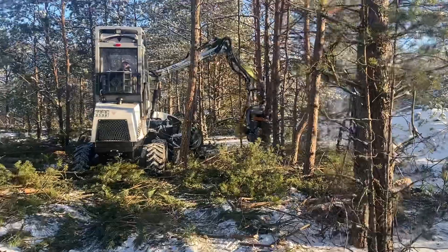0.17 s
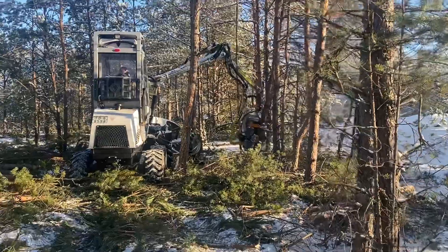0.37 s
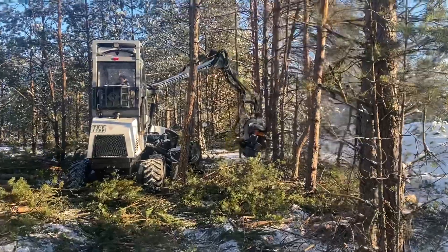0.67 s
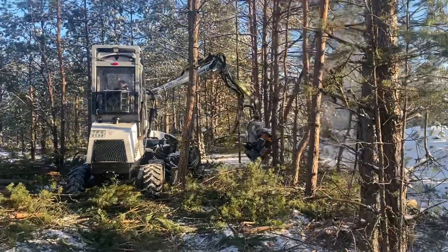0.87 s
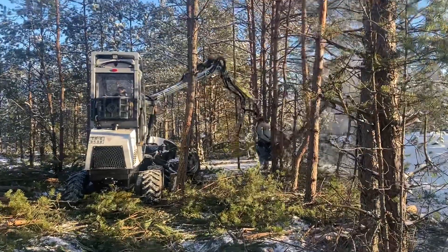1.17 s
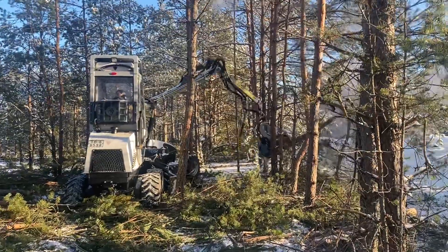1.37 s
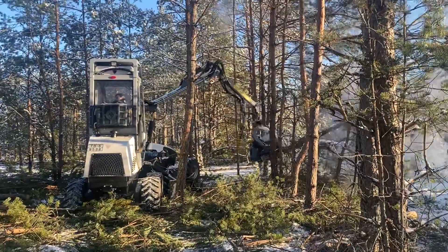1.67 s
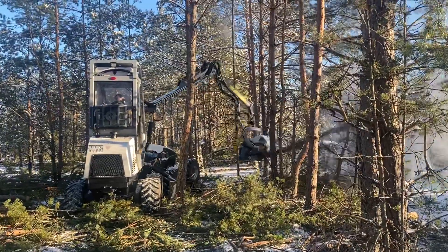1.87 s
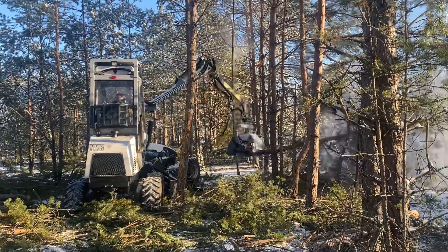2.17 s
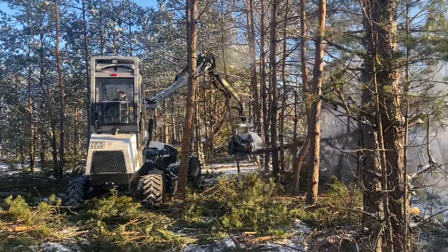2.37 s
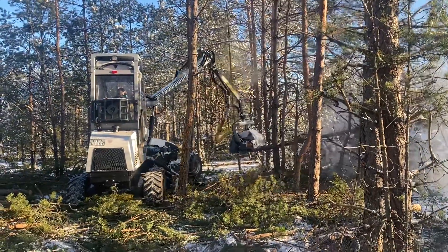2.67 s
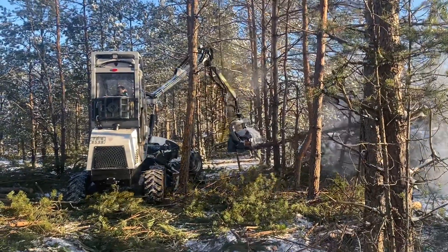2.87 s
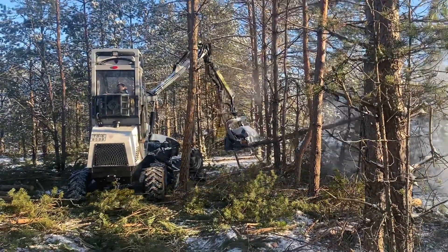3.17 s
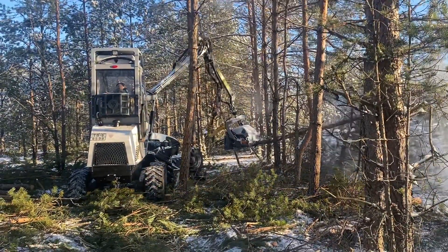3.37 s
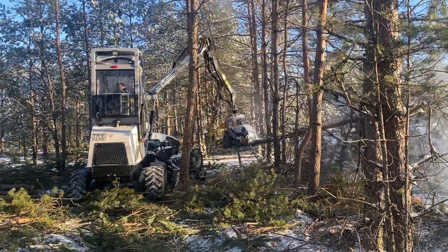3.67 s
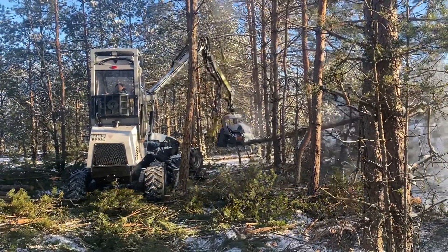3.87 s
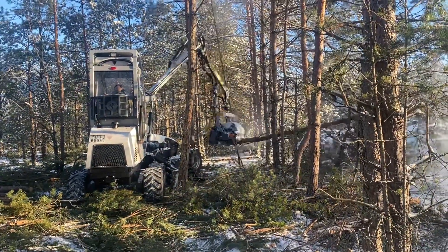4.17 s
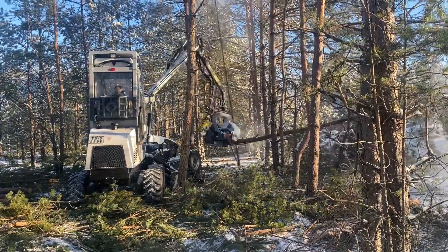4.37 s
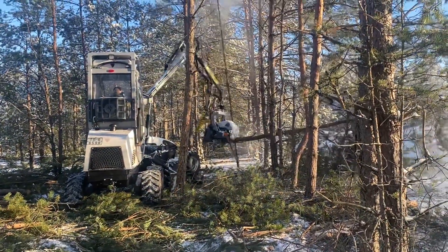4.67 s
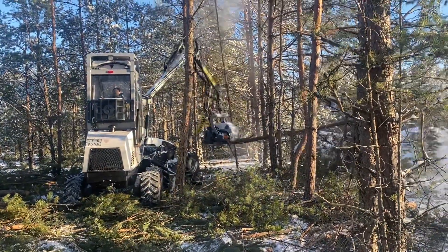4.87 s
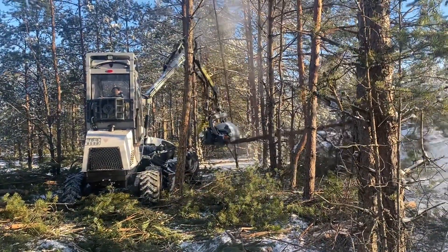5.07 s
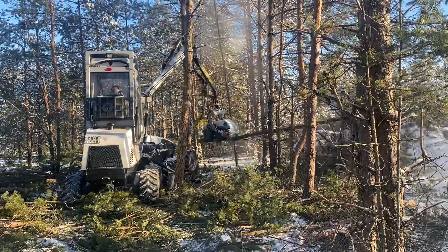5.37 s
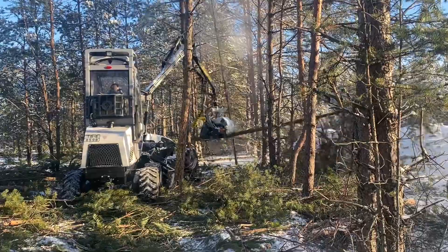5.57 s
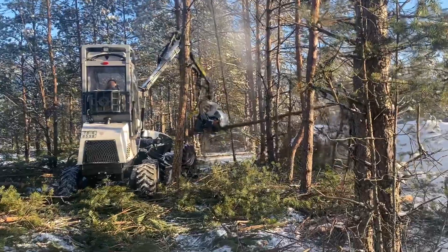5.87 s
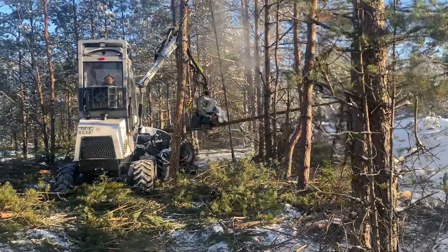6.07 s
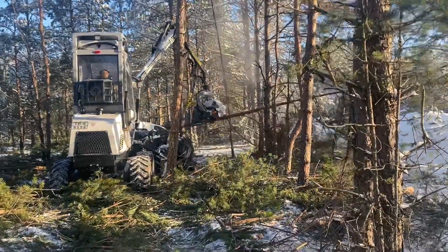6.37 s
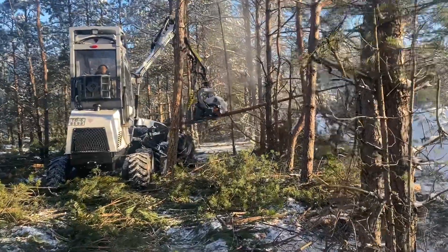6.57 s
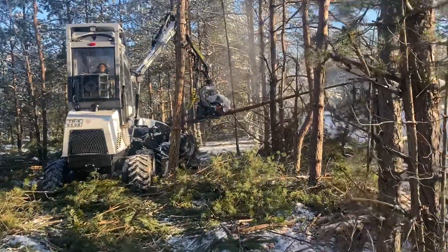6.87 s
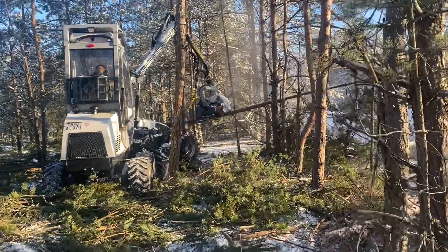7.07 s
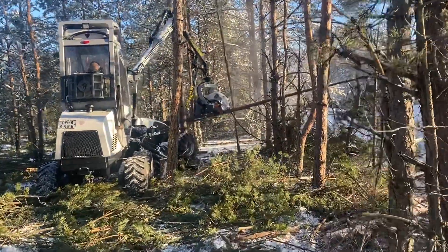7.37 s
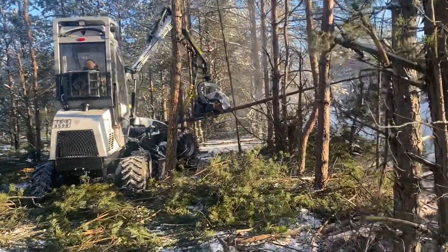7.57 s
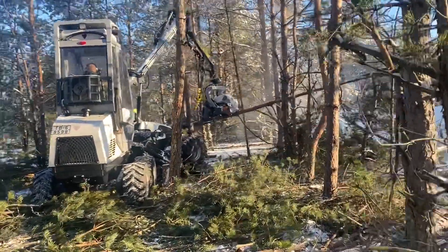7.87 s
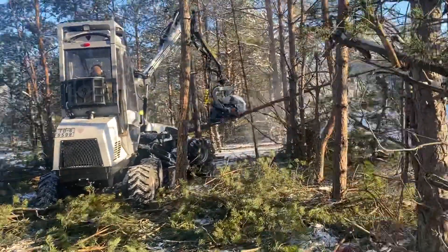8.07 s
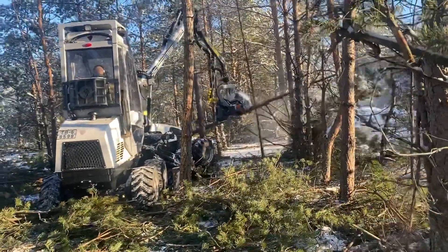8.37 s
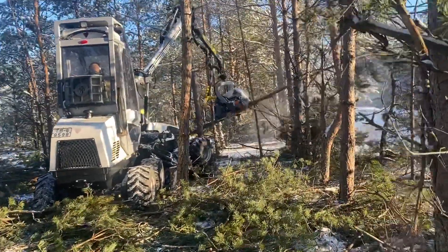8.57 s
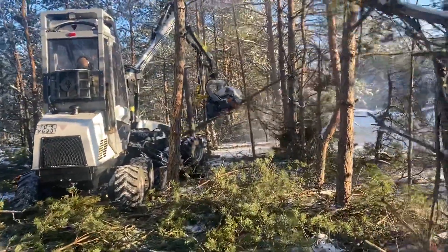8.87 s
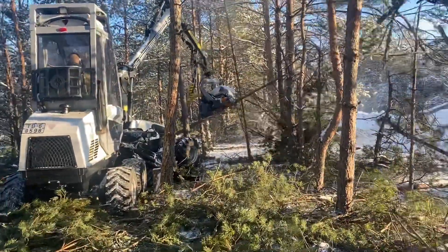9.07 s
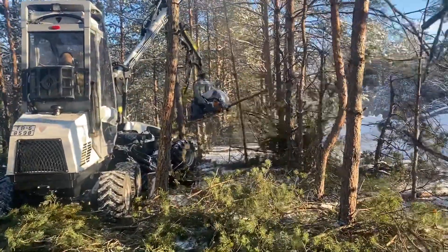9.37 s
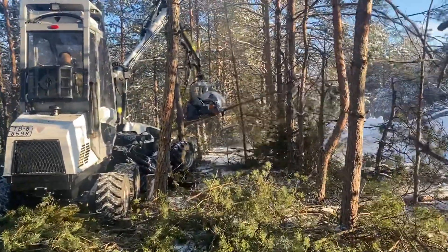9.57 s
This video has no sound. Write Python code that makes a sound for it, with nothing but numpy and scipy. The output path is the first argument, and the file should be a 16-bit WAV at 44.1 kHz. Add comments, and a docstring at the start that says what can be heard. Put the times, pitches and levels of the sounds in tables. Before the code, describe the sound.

A forest harvester's diesel drones and clatters steadily, bogging into a deep boom twice as branches crack sharply and the stem knocks.

```python
"""Forest harvester among snowy pines

A diesel drones as firing-rate harmonics, bogging down and booming whenever the head feeds the stem; shaped
noise throbbing at the firing rate makes the roar and clatter, further tones the whine of fan and pumps.
Twigs snap in bright noise bursts, the stem knocks on the knives as ringing modes, needles and snow rustle
as ticking hiss. The trunks scatter cracks and noise, and two microphones shade and delay what arrives."""
import sys
import numpy as np
from scipy import signal
from scipy.fft import rfft, irfft
from scipy.io import wavfile
from scipy.ndimage import uniform_filter1d

SR = 44100
rng = np.random.default_rng(int(sys.argv[2]) if len(sys.argv) > 2 else 0)


def gain_from_decibels(decibels):
    """Convert decibel values to linear amplitude factors."""
    exponent = np.asarray(decibels, float) / 20
    return 10 ** exponent


def materialize(psi):
    """Save the field psi as 16-bit PCM at rate SR to the path in sys.argv[1].

    A 1-D psi becomes a single channel; in a 2-D psi each row is a channel.
    """
    bounded = np.clip(np.atleast_2d(psi).T, -1, 1)
    quanta = np.round(bounded * 32767).astype(np.int16)
    wavfile.write(sys.argv[1], SR, quanta)


N = 429093
HZ = np.fft.rfftfreq(N, 1 / SR)

# machine noise, growing as it draws nearer: (time [s], roar level [dB], clatter level [dB],
# change of the second exhaust tone [dB], change of the higher exhaust tones [dB])
MACHINE_LEVELS = [(0, -28, -37.5, -2.5, 0.5), (2.2, -27.5, -38, -1.5, -0.5), (3.4, -28, -37.5, -1, -0.5),
                  (3.85, -28.5, -39.5, 1.5, 1.5), (4.9, -28, -38.5, 1, -1), (6.1, -26.5, -35.5, 0, -2),
                  (6.9, -27, -34.5, 4.5, -2), (7.4, -26.5, -35, 3.5, 2), (7.8, -26, -34.5, 1, 2.5),
                  (8.7, -24.5, -34, -2.5, 2), (9.25, -26, -36, -1.5, 2.5), (9.73, -25, -34, 4, 6)]


def level(x, db):
    """Scale to an rms level."""
    return x * gain_from_decibels(db) / np.sqrt(np.mean(x ** 2))


def curves(table):
    """Columns of a table joined by straight lines in time."""
    s, *columns = np.transpose(table)
    return [np.interp(np.arange(N) / SR, s, c) for c in columns]


def noise(colour):
    """Noise with a spectrum of (frequency [Hz], density [dB per Hz]) points, rms 1."""
    hz, db = np.transpose(colour)
    gain = gain_from_decibels(np.interp(np.log(HZ + 1), np.log(hz), db, left=-80, right=-80))
    return level(irfft(gain * rfft(rng.standard_normal(N)), N), 0)


def walk(rate_hz):
    """Random levels held 1 / rate_hz seconds and slewed twice; spread near 1."""
    k = int(SR / rate_hz)
    steps = np.repeat(rng.standard_normal(N // k + 1), k)
    return 1.26 * uniform_filter1d(uniform_filter1d(steps, k), k)[:N]


def add(track, s, piece):
    """Mix a short piece into a track at a time."""
    i = int(s * SR)
    track[i:i + len(piece)] += piece[:N - i]


def ring(x, hz, t60_s):
    """One decaying mode: a two-pole resonator."""
    r = np.exp(-np.log(1000) / (t60_s * SR))
    turn = 2 * np.pi * hz / SR
    return signal.lfilter([np.sin(turn)], [1, -2 * r * np.cos(turn), r * r], x)


def engine_state():
    """Crank phase at the firing rate, load 0-1 and firing tone level; feeding the stem slows and loads the engine."""
    # (time [s], firing rate [Hz], firing tone level [dB])
    engine = [(0, 67.07, -34), (.65, 67.64, -39), (.8, 67.55, -32), (.99, 67.66, -26), (1.12, 67.96, -35.5),
              (1.3, 67.7, -33), (1.5, 68, -31), (1.57, 67.75, -41), (4.38, 68.4, -42), (4.5, 67.4, -34),
              (4.72, 67.7, -31), (4.85, 68, -48), (4.98, 65.1, -29), (5.12, 61.5, -16.5), (5.28, 65.3, -22),
              (5.47, 61.46, -17.5), (5.63, 62.9, -16.5), (5.76, 63.87, -19.5), (5.92, 63.92, -19.5),
              (6.27, 64.9, -19), (6.44, 70.24, -35.5), (7.35, 69.55, -35.5), (7.65, 68.5, -39),
              (7.95, 68.86, -34.5), (8.05, 64.52, -20.5), (8.42, 63.6, -17.5), (9.14, 63.9, -19),
              (9.26, 69.1, -34), (9.73, 68, -55)]
    idle_db, full_db = -38, -18  # firing tone at load 0 and 1
    hz, firing_db = curves(engine)
    wavering_hz = uniform_filter1d(hz, SR // 25) * (1 + 0.00521 * walk(25))
    turn = 2 * np.pi * np.cumsum(wavering_hz) / SR
    load = np.clip((firing_db - idle_db) / (full_db - idle_db), 0, 1)
    return turn, load, firing_db


def tones(turn, load, firing_db):
    """Exhaust harmonics that swell and steady with load, fan and pump tones, and a hum that ignores engine speed."""
    # exhaust and pump tones: (multiple of the firing rate, unloaded level [dB], full-load level [dB], waver [dB])
    harmonics = [(1.62, -39.5, -38, 2.5), (2, -37.5, -26, 2.5), (3, -45, -32, 0.5), (4, -51, -34.5, 4.5),
                 (5, -42, -42, -0.5), (6, -46, -44, 2), (7, -45, -45, 3.5), (8, -44, -69, 1.5),
                 (9, -45, -38, 0.5), (13.5, -49.5, -38, 0.5), (17, -46.5, -49.5, 2)]
    hum_hz, hum_db = 386, -44.5
    uneven = 1 - 0.67 * load
    second_db, upper_db = curves(MACHINE_LEVELS)[2:]
    out = gain_from_decibels(firing_db + 3.0 * uneven * walk(14)) * np.sin(turn + 0.31 * uneven * walk(16))
    for multiple, idle_db, full_db, waver_db in harmonics:
        drift = 3.122 * (multiple - 1) + (0.56 + 0.03 * multiple) * uneven ** 2 * walk(14)
        waver = waver_db * (0.31 + 0.69 * uneven) * walk(9)
        change_db = second_db * (multiple == 2) + upper_db * (3 <= multiple < 10)
        tone_db = idle_db + load ** 2.3 * (full_db - idle_db) + waver + change_db
        out += gain_from_decibels(tone_db) * np.sin(multiple * turn + drift)
    hum_phase = 2 * np.pi * hum_hz * np.arange(N) / SR + 2.4 * walk(7.4)
    out += gain_from_decibels(hum_db + 3.8 * walk(8)) * np.sin(hum_phase)
    return np.sqrt(2) * out  # the levels are rms


def machine_noise(turn, load, rattle):
    """Roar and clatter that throb once a firing, deeper under load; loose parts rattle unevenly."""
    # (frequency [Hz], density [dB per Hz])
    roar_colour = [(18, -61), (30, -28), (54, -6), (136, -3), (168, -7), (210, -4), (239, -9), (263, -5),
                   (381, -4.5), (533, -3.5), (967, -14), (1140, -10.5), (1400, -17.5), (1820, -17.5),
                   (3080, -120)]
    # (frequency [Hz], density [dB per Hz])
    clatter_colour = [(900, -34), (1350, -8.5), (1650, -1), (1900, -3), (2050, 1), (2250, -2.5),
                      (2600, -3.5), (3100, -6), (3500, -11.5), (3900, -18.5), (5000, -25)]
    load_roar_db, load_clatter_db = 1, -1.5  # change at full load
    roar_db, clatter_db, *_ = curves(MACHINE_LEVELS)
    roar_throb = 1 + (0.03 + 0.24 * load) * np.cos(turn + 0.34)
    clatter_throb = 1 + (0.15 + 0.067 * load) * np.cos(turn + 1.0)
    roar = noise(roar_colour) * roar_throb * gain_from_decibels(roar_db + load_roar_db * load)
    clatter = noise(clatter_colour) * clatter_throb * gain_from_decibels(clatter_db + load_clatter_db * load)
    return roar * gain_from_decibels(0.7 * rattle) + clatter * gain_from_decibels(0.75 * rattle)


def snaps(rows):
    """Each break tears for a few milliseconds, with noise about the twig's own pitch, then its echo dies away."""
    # crack spectrum: (frequency [Hz], density [dB per Hz])
    crack_colour = [(2000, -17), (4000, -1.5), (6500, 0.5), (8000, 3), (12000, 1.5), (14000, -7),
                    (15700, -9), (17000, -18)]
    t = np.arange(SR // 5) / SR
    tear = 0.59 * np.exp(-t / 0.0011) + 0.12 * np.exp(-(t / 0.0028) ** 2)
    tear *= np.minimum(t / 0.00089, 1)
    # echoes off the nearest trunks arrive as a bunch after a short gap, over a fading wash
    wash = 0.48 * np.minimum(t / 0.0019, 1) * np.exp(-t / 0.023)
    echo = wash + 0.086 * np.exp(-((t - 0.016) / 0.0038) ** 2)
    uneven = np.pad(gain_from_decibels(2.9 * walk(250)), (0, len(t)))
    top, middle = np.zeros(N), np.zeros(N)
    chances = rng.standard_normal((len(rows), len(t)))
    for (s, db, middle_db, hz, tail_db), chance in zip(rows, chances):
        shape = gain_from_decibels(db) * (tear + gain_from_decibels(tail_db) * echo * uneven[int(s * SR):][:len(t)])
        band = signal.butter(2, [hz / 1.36, hz * 1.21], "band", fs=SR, output="sos")
        twig = signal.sosfilt(band, chance)
        add(top, s, shape)
        add(middle, s, gain_from_decibels(middle_db) * shape * twig / np.std(twig[:SR // 300]))
    crack = noise(crack_colour)
    even_crack = crack / np.sqrt(uniform_filter1d(crack ** 2, SR // 500))
    return top * even_crack + middle


def twigs(shake, count=140):
    """Rows like those of the branches for small twigs that break at random, louder in a shaken crown."""
    base_db, spread_db, tail_db = -26, 2, -17
    when, size, share, pitch = rng.random((count, 4)).T
    shake_db = 20 * np.log10(shake[(when * N).astype(int)] + 0.05)
    db = base_db + shake_db - spread_db * np.log(size + 1e-3)
    return np.c_[when * N / SR, db, -18 + 14 * share, 2800 + 1500 * pitch, np.full(count, tail_db)].tolist()


def knocks():
    """Ragged blows on the knives ring the stem's modes; a few soft thumps lie below."""
    # stem blows: (time [s], drive of the high modes [dB], drive of the deep modes [dB])
    blows = [(0.4257, -27.5, -24), (1.854, -40, -38), (1.917, -29, -40), (2.1899, -30, -41),
             (5.0924, -48, -34), (5.4813, -26, -25), (5.5083, -29.5, -33), (5.6698, -30, -23),
             (5.788, -27, -49), (5.89, -19.5, -23.5), (5.912, -21, -30), (6.111, -19, -23),
             (6.1603, -26, -35), (6.2273, -18.5, -41), (7.9578, -24, -25), (8.121, -33, -47),
             (8.2016, -34, -24), (8.314, -24, -28), (8.391, -26, -26), (8.5489, -17, -16),
             (8.744, -17.5, -25), (8.8492, -34, -24), (9.0265, -20.5, -38), (9.1058, -16, -30),
             (9.1475, -31, -30)]
    # stem modes: (frequency [Hz], level [dB], t60 [s])
    modes = [(647, -2.5, 0.054), (740, 6.5, 0.027), (961, 0, 0.048), (1130, -5, 0.018), (1473, -2.5, 0.035),
             (1700, 2.5, 0.01), (2036, 0, 0.031), (2560, 2.5, 0.0054), (2730, -8, 0.014),
             (3220, -6.5, 0.0055)]
    # dull thumps as the crown lands: (time [s], level [dB], frequency [Hz])
    thumps = [(0.399, -21, 72), (0.869, -15.5, 77), (0.89, -23, 59.2)]
    strike_db = 15  # sharp first contact, against the crunch noise
    crunch_s, grind_s = 0.0033, 0.024
    t = np.arange(SR // 20) / SR
    blow = (np.exp(-t / crunch_s) + 0.26 * np.exp(-t / grind_s)) * 0.11
    high, deep, out = np.zeros(N), np.zeros(N), np.zeros(N)
    strikes = np.full(len(blows), gain_from_decibels(strike_db))
    grits = np.c_[strikes, rng.standard_normal((len(blows), len(t) - 1))]
    for (s, db, deep_db), grit in zip(blows, grits):
        add(high, s, gain_from_decibels(db) * blow * grit)
        # the heavy stem answers a moment after the crack
        add(deep, s + 0.0034, gain_from_decibels(deep_db) * blow * grit)
    for k, (hz, db, t60_s) in enumerate(modes):
        drive = deep if hz < 1000 else high
        out += (-1) ** k * gain_from_decibels(db) * ring(drive, hz, t60_s)
    for s, db, hz in thumps:
        swell = t / 0.0095 * np.exp(1 - t / 0.0074)
        add(out, s, gain_from_decibels(db) * np.sin(2 * np.pi * hz * t) * swell)
    return out


def rustle(shake):
    """Level of the needle and snow hiss: tiny ticks of every size, stronger while branches are shaken."""
    rest_db, shake_db = -50.5, 10.5  # hiss bed at rest, its rise at full shaking
    ticks = (rng.random(N) < 70 / SR) * gain_from_decibels(3.8 * rng.exponential(size=N).clip(0, 3))  # 70 per second
    bursts = signal.lfilter([1], [1, -np.exp(-1 / (0.0026 * SR))], ticks)
    rise = gain_from_decibels(shake_db * shake)
    return gain_from_decibels(rest_db + 0.5 * walk(8.7)) * rise * (1 + 0.19 * np.sqrt(rise) * bursts)


def scene():
    """The direct sound and, as a second channel, the cracks and noise scattered by the trunks."""
    # louder branches snapping: (time [s], level [dB], noise about the pitch over the crack [dB],
    # pitch [Hz], echo level [dB])
    branches = [(0.3135, -22, -15, 2820, -10), (0.463, -5.5, -13, 6140, -27), (0.488, -23.5, 6, 6200, -13),
                (0.735, -20, -18, 3620, -27), (0.9782, -9, 1.5, 4250, -16.5),
                (1.2072, -21.5, -10, 4380, -14), (1.515, -17.5, 0, 5570, -14),
                (1.9133, -19.5, -21, 2860, -19), (1.9719, -20.5, -11, 3410, -9),
                (2.157, -11.5, -4, 3244, -19), (2.1909, -9, 1, 3380, -19.5), (2.231, -17, -18, 4120, -18),
                (2.295, -18, -5, 3990, -11), (3.8124, -25, -14, 3140, -11), (4.576, -16, -0.5, 3495, -9.5),
                (5.02, -21.5, -18, 2837, -8), (5.214, -16.5, -8, 4150, -17), (5.2496, -19, -14, 2880, -22),
                (5.44, -18, -22, 4495, -10), (5.4824, -2.5, -17, 5120, -26), (5.5035, -12.5, -5, 3980, -10),
                (5.629, -12, -1, 5450, -23), (5.6849, -6.5, -23, 5360, -18), (5.76, -27, 4, 4200, -20),
                (5.789, -13.5, -1, 4360, -18), (5.8232, -28, 8, 3850, -24), (5.8454, -32, 15, 3610, -20),
                (5.889, -5, -13, 4097, -16), (5.9065, -26.5, 5.5, 4000, -15), (5.9618, -19, -24, 2970, -30),
                (6.0175, -11.5, -20, 3750, -22), (6.0815, -17, -20, 4990, -23),
                (6.0902, -14.5, -26, 5915, -11), (6.1391, -21, -6, 4050, -17),
                (6.1597, -9.5, -9, 6390, -16), (6.2279, -6.5, -0.5, 4200, -18),
                (6.607, -25, -16, 2900, -28), (7.866, -10, -12, 3925, -24), (7.8794, -11, -20, 5670, -24),
                (7.9576, -5, -7.5, 6490, -17), (7.997, -15, 2.5, 3397, -18), (8.0183, -20, -1, 5530, -12),
                (8.1289, -25, -15, 2877, -27), (8.272, -26.5, 10, 3733, -14), (8.3195, -22, -3, 4384, -7),
                (8.3781, -18, -10, 4367, -20), (8.3915, -13, 3.5, 4900, -10), (8.4678, -17, -8, 3010, -16),
                (8.5482, -25.5, 10.5, 4725, -9), (8.6358, -20, -16, 2868, -13),
                (8.744, -4.5, -4, 3747, -12), (8.8199, -16, -13, 4065, -24), (8.8415, -13.5, 0, 6125, -19),
                (9.0267, -3, -0.5, 4190, -13.5), (9.1048, -19, 10, 2816, -17), (9.1433, -26, 7, 4280, -15),
                (9.653, -24, -13, 3000, -17)]
    # how hard the branches are shaken: (time [s], strength [0-1])
    shaking = [(0, 0.08), (.43, 0.6), (.7, 0.37), (1.1, 0.48), (2.2, 0.62), (2.4, 0.27), (3.85, .05),
               (4.4, 0.31), (4.72, 0.08), (5.05, .45), (5.66, 0.81), (6.25, 0.62), (6.5, 0.29), (7.6, 0.42),
               (7.95, 0.74), (8.3, 0.66), (8.7, 0.91), (9.25, .55), (9.73, .4)]
    # needle and snow hiss: (frequency [Hz], density [dB per Hz])
    hiss_colour = [(2500, -12), (3500, -5.5), (5000, 0), (7800, -4.5), (8500, -3.5), (12000, -3),
                   (14000, -15.5), (15600, -8.5), (17000, -30)]
    turn, load, firing_db = engine_state()
    shake = np.clip(curves(shaking)[0], 0, 1)
    rattle, hiss = walk(45), rustle(shake)
    distinct = snaps(branches + twigs(shake)) + knocks()
    t = np.arange(SR // 4) / SR
    trunks = rng.standard_normal(len(t)) * np.exp(-t / 0.0041)
    scattered = signal.fftconvolve(distinct, trunks / np.sqrt(np.sum(trunks ** 2)))[:N]
    # steady noise arrives from many trunks at once, unrelated to the direct noise
    beds = [machine_noise(turn, load, rattle) + hiss * noise(hiss_colour) for _ in range(2)]
    return np.array([distinct + tones(turn, load, firing_db), scattered]) + beds


def low_pass(x):
    """Removes everything above the highest recorded frequency."""
    return signal.sosfilt(signal.butter(12, 17120, fs=SR, output="sos"), x)


def record(dry):
    """Two microphones shade and delay the direct sound; scattered sound enters them in antiphase; peaks are rounded."""
    # (frequency [Hz], left minus right [dB], left lead [rad], scattered over direct gain [dB])
    ports = [(60, 1.5, -0.06, -10), (250, 0.5, 0, -19.5), (665, 1.5, -0.01, -10.5), (1370, 2.5, 0.47, -5),
             (2080, 3.5, 0, -34), (2650, 3, 1.03, -7), (3150, -1.5, -1.6, -0.5), (4200, -4.5, 0, -5),
             (5570, -7.5, -1.1, -2), (6800, -4, -0.9, -7), (8090, -1, 2.06, -17), (8450, 2.5, 3.5, -37),
             (9240, -1.5, 3.5, -32), (10300, 1, 5.5, -28), (11630, 0, 7, -20), (13260, 0, 9, -30),
             (14100, -1, 10, -30), (15000, 0, 10.5, -15), (15800, 0, 12.6, -20)]
    top_hz = 15780  # steep treble limit
    hz, pan_db, lead_rad, scatter_db = np.transpose(ports)
    direct, scattered = rfft(dry)
    side = np.array([[0.5], [-0.5]])
    share = gain_from_decibels(np.interp(HZ, hz, scatter_db))
    shading = gain_from_decibels(side * np.interp(HZ, hz, pan_db))
    delay = np.exp(1j * side * np.interp(HZ, hz, lead_rad))
    ears = shading * delay * (direct + 2 * side * share * scattered) / np.sqrt(1 + share ** 2)
    ears = ears / (1 + (HZ / top_hz) ** 240)
    mix = np.tanh(0.55 * irfft(ears, N)) / 0.55
    return low_pass(mix)


dry = scene()
out = record(dry)
materialize(out)
```